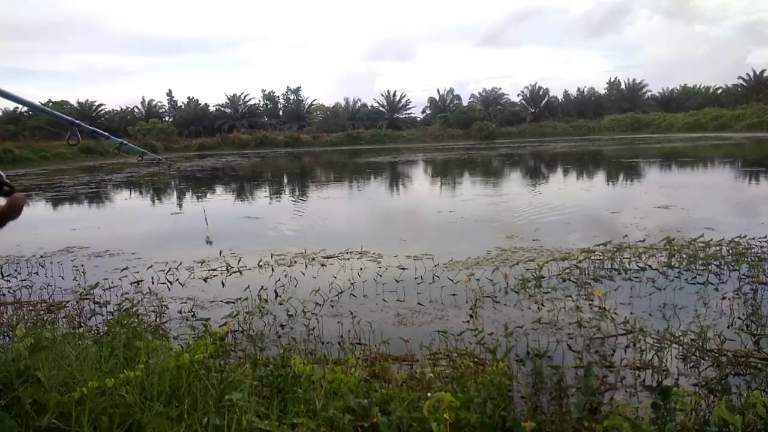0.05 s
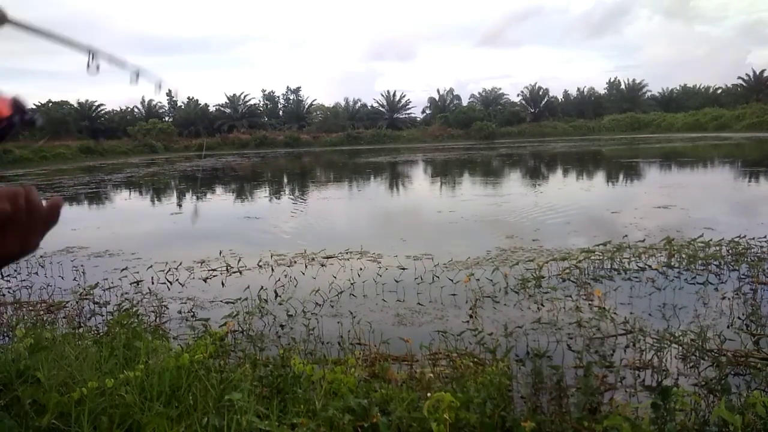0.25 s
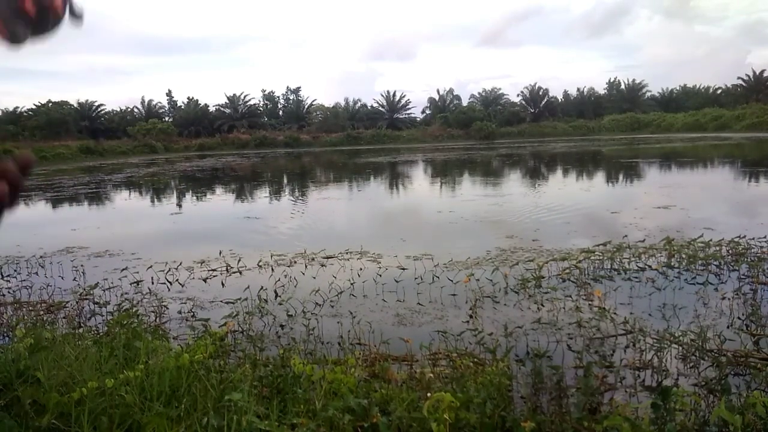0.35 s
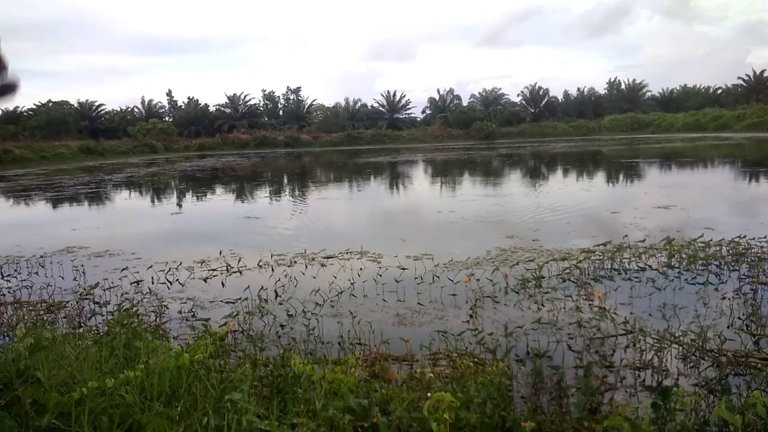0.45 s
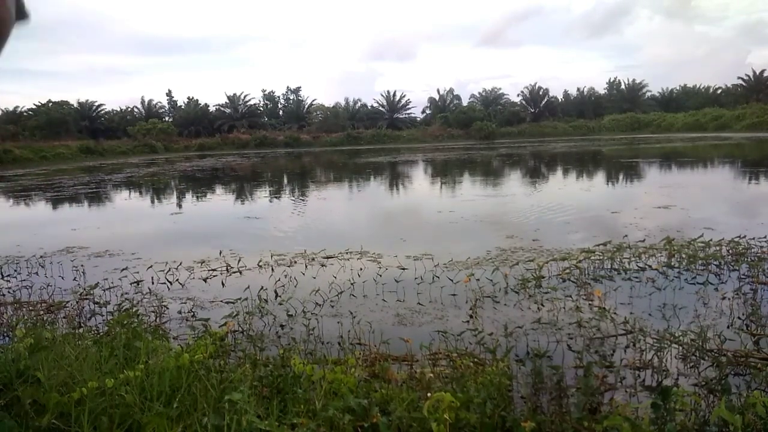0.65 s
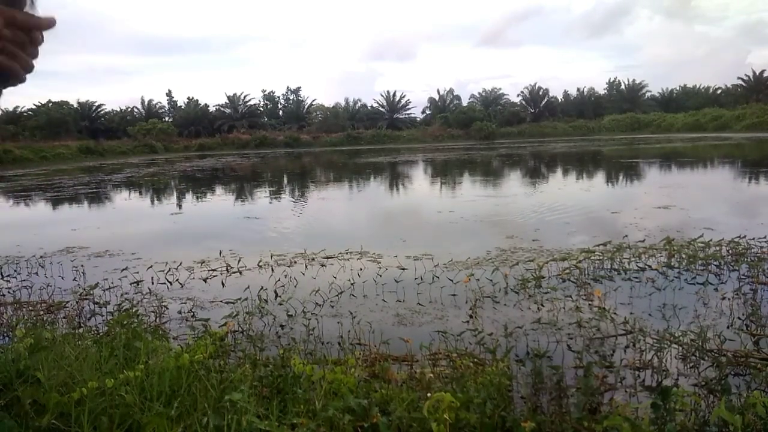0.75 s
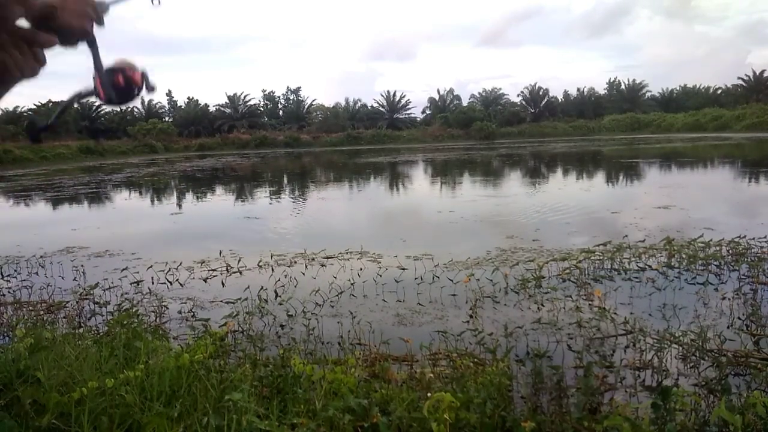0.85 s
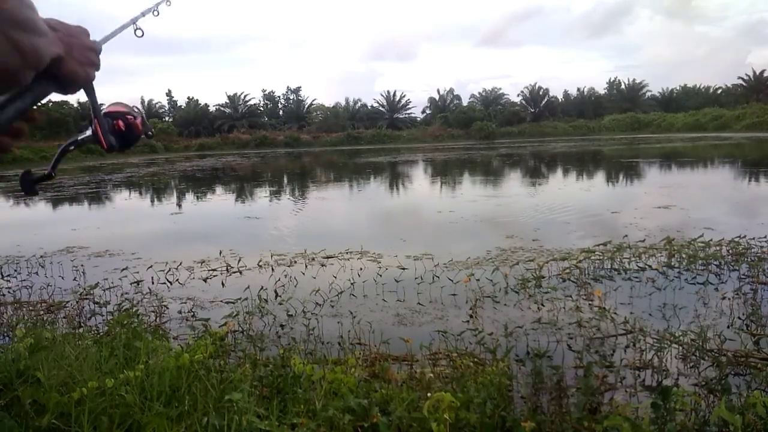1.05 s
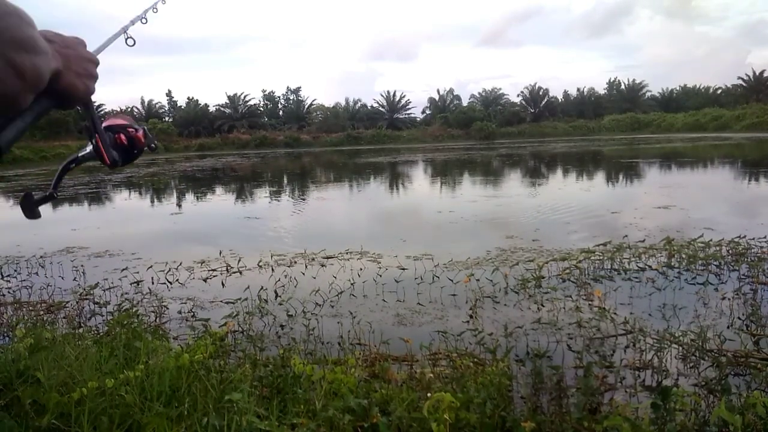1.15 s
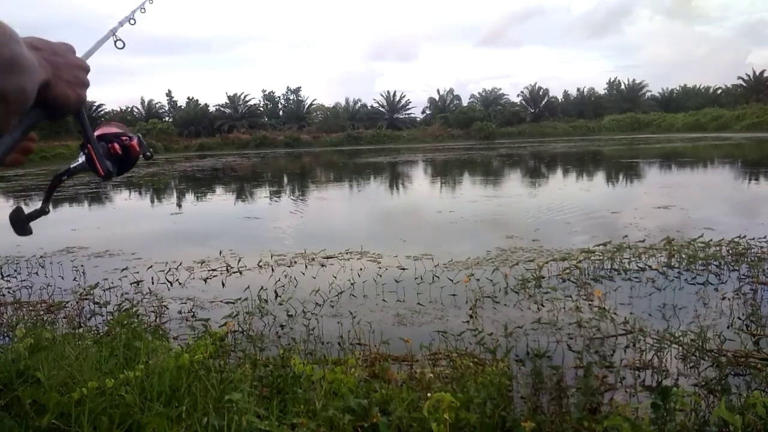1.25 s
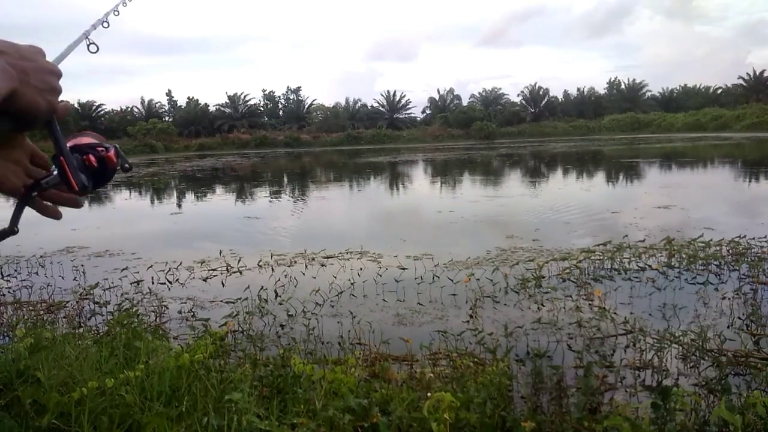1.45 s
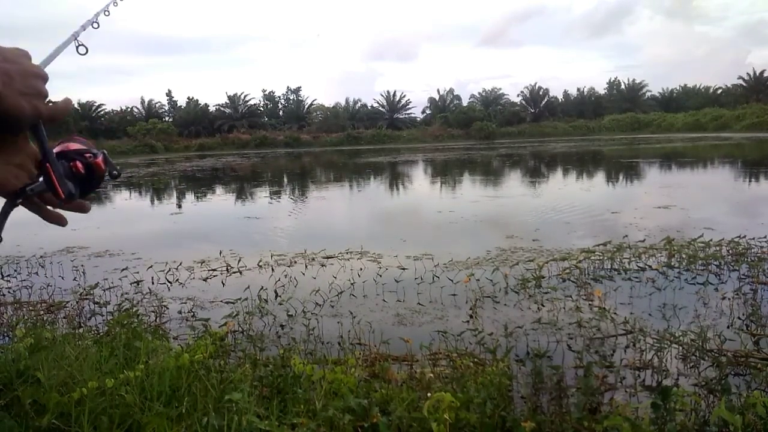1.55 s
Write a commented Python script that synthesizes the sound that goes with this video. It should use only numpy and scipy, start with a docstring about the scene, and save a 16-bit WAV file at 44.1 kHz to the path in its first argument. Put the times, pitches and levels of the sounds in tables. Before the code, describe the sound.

Close fishing reel clacks, small parts tick, a rod whooshes back over high insect whine outdoors

```python
"""A spinning reel close up by a swamp, over rumbling wind, air hiss and two insects near 10 kHz: one whines in
falling chirps, one far to the right ticks in swelling buzzes. After a faint contact the bail snaps as clustered
clicks ringing the reel's modes; small parts click; then the rod swishes back as shaped noise under a rising
whistle while the grip thumps the housing as damped low sines. A far bird gives short steady notes, one early
and two later. The left channel is much weaker than the right."""
import sys
import numpy as np
from scipy import signal
from scipy.fft import rfft, irfft
from scipy.io import wavfile
from scipy.ndimage import uniform_filter1d, map_coordinates

SR = 44100
rng = np.random.default_rng(int(sys.argv[2]) if len(sys.argv) > 2 else 0)


def field_ratio(decibels):
    """Amplitude ratio for a level in dB (20 dB per decade); scalars and array-likes work."""
    return 10 ** (np.asarray(decibels, dtype=float) / 20)


def int16_out(signal):
    """Quantize to a 16-bit WAV file."""
    q = np.round(np.clip(np.atleast_2d(signal).T, -1, 1) * 32767)
    wavfile.write(sys.argv[1], SR, q.astype(np.int16))


N = 70560
T = np.arange(N) / SR


def unit(x):
    """Scaled to rms 1."""
    return x / np.sqrt(np.mean(x ** 2) + 1e-20)


def curves(rows):
    """One value per sample for each column after the time."""
    s, *cols = np.transpose(rows)
    return [np.interp(T, s, c, left=c[0], right=c[-1]) for c in cols]


def wobble(rate):
    """A smooth random curve, rate knots a second."""
    return map_coordinates(rng.standard_normal(N // 8), [T * rate])


def sine(hz):
    """A sine that follows a pitch curve in Hz."""
    return np.sin(2 * np.pi * np.cumsum(hz) / SR)


def colour(x, points):
    """x filtered by (Hz, dB) points, joined on a log pitch scale."""
    f, db = np.transpose(points)
    hz = np.fft.rfftfreq(len(x), 1 / SR)
    gain_db = np.interp(np.log(hz + 1), np.log(f + 1), db, left=-120, right=-120)
    return irfft(rfft(x) * field_ratio(gain_db), len(x))


def noise(points, size=N):
    """Noise of rms 1 coloured by (Hz, dB) points."""
    return unit(colour(rng.standard_normal(size), points))


def patchy(points):
    """Coloured noise of rms 1 whose gain varies in small patches of time and pitch."""
    patch_db = 3
    z = signal.stft(rng.standard_normal(N), nperseg=512)[2]
    field = uniform_filter1d(rng.standard_normal(z.shape), size=3, axis=0)
    field = uniform_filter1d(field, size=5, axis=1)
    grains = signal.istft(z * field_ratio(patch_db * unit(field)), nperseg=512)[1][:N]
    return unit(colour(grains, points))


# Gusts of the wind. Each row: time in seconds, level in dB.
WIND_LEVEL = [(0, -55), (.12, -51.5), (.2, -52.5), (.27, -40), (.34, -43), (.41, -47), (.5, -53),
              (.86, -54.5), (.93, -46), (1.03, -43.5), (1.13, -56.5), (1.19, -45), (1.25, -52.5),
              (1.32, -49.5), (1.38, -58), (1.48, -50.5), (1.56, -44), (1.6, -48)]
# Tone of the wind rumble. Each row: pitch in Hz, gain in dB.
WIND_TONE = [(11, -33), (18, -0.5), (54, 5), (86, -3.5), (135, -4.5), (179, -45), (300, -39), (390, -47),
             (660, -120)]
# Tone of the air hiss. Each row: pitch in Hz, gain in dB.
AIR_TONE = [(88, -21), (150, -6), (350, -14), (489, -18), (951, -21.5), (3150, -34.5), (4860, -39.5),
            (7120, -37), (8000, -31.5), (10400, -60), (17600, -120)]
# Notes of the far bird. Each row: start in seconds, length in seconds, pitch in Hz, level in dB.
BIRD_NOTES = [(.74, .09, 1310, -62), (.09, .09, 1345, -72), (1.35, .05, 1270, -70)]


def outdoors():
    """Lumpy low noise for wind, patchy air hiss that a noise suppressor lifts slightly, and bird notes as sines."""
    wind = field_ratio(curves(WIND_LEVEL)[0] + 1.3 * wobble(41)) * noise(WIND_TONE)
    opening_db, = curves(WHINE_LEVEL)
    air_db, air_share = -61, 0.085  # the opening that lifts the whine lifts the air by this share of its dB
    air = field_ratio(air_db + air_share * (opening_db + 48) + wobble(12)) * patchy(AIR_TONE)
    bird = np.zeros(N)
    for start, length, hz, db in BIRD_NOTES:
        arch = np.sin(np.pi * np.clip((T - start) / length, 0, 1)) ** 0.5
        bird += field_ratio(db) * arch * np.sin(2 * np.pi * hz * T)
    return wind + air + bird


# Treble hiss in three stretches. Each row: time in seconds, lower band in dB, upper band in dB, before lift.
HISS_LEVELS = [
    [(0.0, -78, -100), (0.024, -69, -103), (0.04, -65, -55), (0.05, -63, -80), (0.122, -112, -106),
     (0.17, -62, -75), (0.174, -89, -86), (0.21, -98, -75), (0.215, -79, -82)],
    [(0.26, -47, -60), (0.282, -54.5, -65), (0.452, -86, -90), (0.482, -43, -45), (0.548, -58, -90),
     (0.62, -61, -67), (0.686, -53.5, -89), (0.738, -62.5, -100), (0.8, -87, -91)],
    [(0.81, -80, -81), (0.834, -56, -85), (0.86, -44, -40.5), (0.878, -32.5, -33.5), (0.976, -48.5, -43),
     (1.048, -42, -39), (1.262, -63, -55.5), (1.316, -71, -51), (1.6, -72.5, -84)],
]
# Tone of the lower hiss band. Each row: pitch in Hz, gain in dB.
HISS_LOW_TONE = [(2500, -25.5), (4500, -16.5), (6000, -7), (8500, 1.5), (9500, 9), (10500, -17)]
# Tone of the upper hiss band. Each row: pitch in Hz, gain in dB.
HISS_HIGH_TONE = [(9000, -13), (10000, 0.5), (11300, 2.5), (12100, -7), (12400, -30)]


def hiss():
    """Treble noise in two overlapping bands, the lower one patchy, each flickering on its own level."""
    low_db, high_db = curves(sum(HISS_LEVELS, []))
    low_lift_db, high_lift_db = 0.5, 4
    low = field_ratio(low_db + low_lift_db + 1.5 * wobble(140)) * patchy(HISS_LOW_TONE)
    high = field_ratio(high_db + high_lift_db + 1.5 * wobble(200)) * noise(HISS_HIGH_TONE)
    return low + high


# Whine of the first insect, lifted as a noise suppressor opens after each hit.
# Each row: time in seconds, level in dB.
WHINE_LEVEL = [(0, -53.5), (.028, -54), (.044, -41.5), (.07, -44.5), (.115, -53.5), (.214, -53),
               (.228, -24), (.256, -31), (.305, -33.5), (.335, -42.5), (.45, -56), (.472, -45), (.486, -30),
               (.545, -34), (.62, -49.5), (.72, -48.5), (.765, -54), (.775, -48.5), (.825, -47.5),
               (.872, -28), (.926, -31.5), (.95, -43), (1, -35), (1.13, -33), (1.17, -42), (1.25, -47),
               (1.33, -51), (1.38, -53), (1.5, -52.5), (1.56, -45.5), (1.6, -50.5)]
# Tone that trims the chirps. Each row: pitch in Hz, gain in dB.
CHIRP_TONE = [(8300, -50), (9000, 2.5), (9800, 5.5), (10600, 4.5), (11300, -10), (11800, -58)]


def chirper():
    """A narrow noisy band that falls in pitch once a cycle, loudest mid-cycle."""
    chirps_per_s, first_cycle, depth = 93, 0.3, 0.45
    top_hz, fall_hz, wide_hz = 10570, 1493, 340
    cycle = (first_cycle + chirps_per_s * T + 0.032 * wobble(21)) % 1
    phase = 2 * np.pi * np.cumsum(top_hz - fall_hz * cycle) / SR
    # slow noise on both quadratures spreads the carrier into a band
    band = [(1, 0), (wide_hz, -3), (3.4 * wide_hz, -22), (3000, -40)]
    song = noise(band) * np.cos(phase) + noise(band) * np.sin(phase)
    pulse = 1 - depth * np.cos(2 * np.pi * cycle)
    song = colour(song * pulse * field_ratio(1.2 * wobble(30.2)), CHIRP_TONE)
    return unit(song) * field_ratio(curves(WHINE_LEVEL)[0])


# Buzzes of the second insect. Each row: end in seconds, level reached at the end in dB.
BUZZ_ENDS = [(0.083, -46), (.21, -51), (0.324, -39.5), (0.418, -54), (0.524, -45), (.63, -57), (.73, -51.5),
             (0.934, -30.5), (1.041, -30), (1.143, -26.5), (1.248, -33), (1.337, -39), (1.36, -39),
             (1.46, -35.5), (1.576, -46)]
# Tone of the noise in the ticks. Each row: pitch in Hz, gain in dB.
BUZZ_TONE = [(8800, -45), (9500, -26), (10000, 8), (10500, -14), (11300, -16), (12000, -32)]
# Body that lets no click through from the cut buzzes. Each row: pitch in Hz, gain in dB.
BUZZ_BODY = [(8000, -40), (8800, -1.5), (11200, 3), (12000, -36)]
# Rasp under the buzzes. Each row: time in seconds, level in dB.
RASP_LEVEL = [(0, -65.5), (1, -62), (1.15, -48), (1.3, -49), (1.45, -43), (1.6, -65.5)]
# Tone of the rasp. Each row: pitch in Hz, gain in dB.
RASP_TONE = [(8500, -34), (9300, -4), (10200, 11.5), (11300, -13.5), (12100, -18), (12400, -44.5)]


def buzzer():
    """Fast pitched ticks, each sagging in pitch, swell through every buzz and stop short over a pulsing rasp."""
    ticks_per_s, tick_s = 141, 0.0017
    pitch_hz, scatter_hz, sag_hz, noise_share = 9910, 61.3, 2200, 0.35
    rise_db_per_s, buzz_s = 154, 0.11
    count = np.cumsum(ticks_per_s * (1 + 0.006 * wobble(20))) / SR
    cycle = count % 1 - 0.5
    chance = rng.standard_normal((N // 100, 2))[count.astype(int)]  # one pair of draws a tick
    tone = sine(pitch_hz + scatter_hz * chance[:, 0] - sag_hz * cycle)
    pulse = np.exp(-(cycle / ticks_per_s / tick_s) ** 2) * field_ratio(1.3 * chance[:, 1])
    ticks = unit(pulse * tone + noise_share * (0.74 + pulse) * noise(BUZZ_TONE))
    swell = np.zeros(N)
    for end, db in BUZZ_ENDS:
        rise = field_ratio(db - rise_db_per_s * np.clip(end - T, 0, 1))
        gate = np.minimum((end - T) / 0.00084, (T - end + buzz_s) / 0.03)  # abrupt stop, softer start
        swell += rise * np.clip(gate, 0, 1)
    rasp = field_ratio(curves(RASP_LEVEL)[0]) * unit(0.6 + pulse) * noise(RASP_TONE)
    return colour(ticks * swell, BUZZ_BODY) + rasp


# Thumps of the grip. Each row: start in seconds, level in dB, pitch in Hz, time to fall 60 dB in seconds.
GRIP_THUMPS = [(0.213, -38, 45, 0.089), (.25, -19, 27.9, 0.084), (0.936, -14, 22.7, 0.049),
               (0.958, -15.5, 38.4, 0.095), (1.192, -41, 45, 0.17)]


def thumps():
    """Low damped sines, pushes through the housing that go in or out by sign."""
    out = np.zeros(N)
    for (start, db, hz, t60), sign in zip(GRIP_THUMPS, (-1, 1, -1, 1, -1)):
        t = np.clip(T - start, 0, 9)
        out += sign * field_ratio(db - 60 * t / t60) * np.sin(2 * np.pi * hz * t)
    return out


# Swish of rod and line. Each row: time in seconds, body in dB, top in dB.
SWISH_LEVELS = [(0.8, -65, -125), (0.822, -72, -119), (0.878, -39, -52), (0.896, -33, -42),
                (0.946, -47, -46.5), (0.99, -58.5, -63), (1.064, -53, -66), (1.078, -54, -79),
                (1.102, -60, -62), (1.14, -73, -99), (1.164, -67, -88), (1.174, -75, -96), (1.3, -69, -97)]
# Tone of the swish body. Each row: pitch in Hz, gain in dB.
SWISH_BODY_TONE = [(150, -51), (250, -11.5), (565, -10), (708, -8.5), (956, -12), (1210, -13), (5000, -11),
                   (6500, -13), (11000, -120)]
# Tone of the swish top. Each row: pitch in Hz, gain in dB.
SWISH_TOP_TONE = [(12000, -13), (12500, 3), (14000, -3), (15600, -1.5), (15800, -19)]
# Line whistling up. Each row: time in seconds, pitch in Hz, level in dB.
LINE_WHISTLE = [(.81, 2500, -76), (.83, 4300, -60), (.855, 7000, -53)]


def swish():
    """Air noise around the rod, body and top on their own levels, with a faint whistle rising at the start."""
    body_db, top_db = curves(SWISH_LEVELS)
    fade_s = 0.042
    on = np.clip(np.minimum(T - SWISH_LEVELS[0][0], SWISH_LEVELS[-1][0] - T) / fade_s, 0, 1)
    body = field_ratio(body_db + wobble(300)) * patchy(SWISH_BODY_TONE)
    top = field_ratio(top_db + wobble(300)) * noise(SWISH_TOP_TONE)
    hz, db = curves(LINE_WHISTLE)
    sounding = (T > LINE_WHISTLE[0][0]) * (T < LINE_WHISTLE[-1][0])
    whistle = field_ratio(db + 4 * wobble(700)) * sine(hz * (1 + 0.16 * wobble(1500))) * sounding
    return on * (body + top) + whistle


# Contacts of the bail and lever. Each row: start in seconds, level in dB, centre of the modes reached in Hz,
# loss away from it in dB per octave, level of the top ring in dB.
CONTACTS = [(0.041, -48, 7200, 3.5, -40), (.223, -27.5, 3400, 1, -12), (0.2257, -16, 10900, 3.5, -16),
            (.23, -13.5, 7200, 6.5, 4.5), (.2355, -19, 6000, 7, 8), (.2408, -14, 10000, 23, -7),
            (0.248, -31, 8000, 1, -2.5), (.48, -33, 8150, 17, -48), (.49, -28.5, 5140, 11, -46),
            (0.874, -31, 9000, 6, -17), (0.899, -28.5, 4400, 7, -16)]
# Dull knocks that reach only the modes next to one pitch. Each row: start in seconds, level in dB, pitch in Hz.
DULL_KNOCKS = [(0.2275, -13.5, 3450), (.229, -20.5, 1050), (.231, -19, 1640), (0.4792, -19, 3844),
               (0.4873, -32, 2000), (0.4908, -38, 1050), (0.4943, -31.5, 2000), (0.663, -46, 5200),
               (.692, -42, 3870), (0.963, -40, 2000), (1.05, -43, 2370), (1.059, -42, 2000),
               (1.085, -47, 3900), (1.232, -50, 2800)]
# Modes of the reel body. Each row: pitch in Hz, level in dB, time to fall 60 dB in seconds.
REEL_MODES = [(1050, -14.5, 0.014), (1401, 2, 0.01), (1689, -12.5, .035), (2000, -6, 0.024),
              (2430, -11, 0.012), (3450, -7.5, 0.011), (3900, -16, 0.0081), (4400, -12, 0.0051),
              (4875, -17.5, .03), (6270, -12.5, 0.012), (7050, -6.5, 0.029), (8800, -9, 0.01),
              (10000, -2.5, 0.007), (10230, 5, 0.014), (11900, 3, 0.0122), (13500, -12, 0.021)]
# The thin wire's own pair. Each row: pitch in Hz, level in dB, time to fall 60 dB in seconds.
WIRE_MODES = [(15040, -3, .025), (15230, -3, .03)]
# Tone of the dying rattle after a contact. Each row: pitch in Hz, gain in dB.
RATTLE_TONE = [(350, -62), (600, -26), (1200, -24), (3580, -13), (4280, -16.5), (8590, -7), (9980, -14),
               (15600, -44)]


def reel():
    """Every contact rings the modes near its own pitch, cracks and leaves a short rattle."""
    knock_slope_db, knock_top_db = 34, -70
    crack_db, crack_t60 = -1, 0.012
    rattle_db, rattle_t60 = -24, 0.12
    out, t = np.zeros(N + SR), np.arange(8192) / SR
    hz, level, t60 = np.transpose(REEL_MODES + WIRE_MODES)[:, :, None]
    wire = hz > 14000
    knocks = [(*k, knock_slope_db, knock_top_db) for k in DULL_KNOCKS]
    onset = 1 - np.exp(-(t / 0.0004) ** 2)
    for start, db, centre_hz, slope_db, top_db in CONTACTS + knocks:
        def reach(f):
            """Gain in dB that falls with distance from the contact's pitch."""
            return -abs(slope_db * np.log2(f / centre_hz))

        chance = rng.standard_normal((2, len(hz), 1))
        mode_db = level + 2 * chance[0] + np.where(wire, top_db, reach(hz))
        mode_hz = hz * (1 + 0.012 * ~wire * chance[1])  # the body modes shift a little, the wire stays
        ring = (field_ratio(mode_db - 60 * t / t60) * np.sin(2 * np.pi * mode_hz * t)).sum(0)
        crack_tone = [(f, reach(f)) for f in sorted((800, centre_hz, 13000))]
        crack = field_ratio(crack_db - 60 * t / crack_t60) * noise(crack_tone, size=8192)
        rattle_tone = [(f, d + reach(f)) for f, d in RATTLE_TONE]
        rattle = field_ratio(rattle_db - 60 * t / rattle_t60) * noise(rattle_tone, size=8192)
        out[round(start * SR):][:len(t)] += field_ratio(db) * (ring + crack + rattle) * onset
    return out[:N]


def scene():
    """Everything reaches both channels, weaker and smeared on the left; the buzzer, unsmeared, sits far right."""
    left_db, smear_db, buzz_left_db = -15.5, -17, -29
    near = outdoors() + hiss() + chirper() + thumps() + swish() + reel()
    smear = rng.standard_normal(48) * np.exp(-np.arange(48) / 12)
    smear = (smear - smear.mean()) / np.linalg.norm(smear)
    smeared = near + field_ratio(smear_db) * np.convolve(near, smear)[:N]
    buzz = buzzer()
    left = field_ratio(left_db) * smeared + field_ratio(buzz_left_db) * buzz
    right = near + buzz
    return np.array([left, right]) * 2 / (1 + field_ratio(left_db))


def low_pass(x):
    """Removes everything above the highest recorded frequency."""
    return signal.sosfilt(signal.butter(12, 15800, fs=SR, output="sos"), x)


def record(dry):
    """Cuts everything from 15.8 kHz up, then clips at full scale."""
    banded = irfft(rfft(dry) * (np.fft.rfftfreq(N, 1 / SR) < 15800), N)
    mix = np.clip(banded, -1, 1)
    return low_pass(mix)


dry = scene()
out = record(dry)
int16_out(out)
```